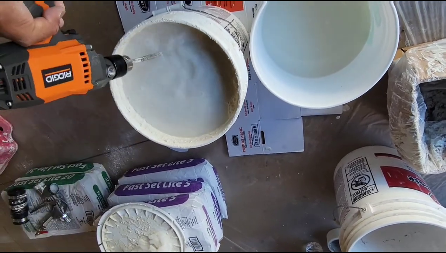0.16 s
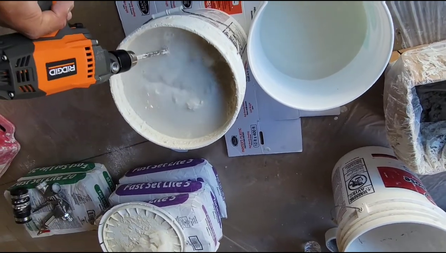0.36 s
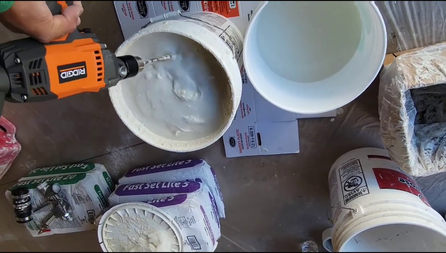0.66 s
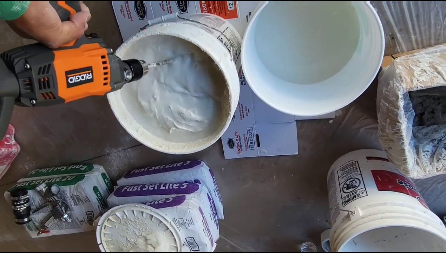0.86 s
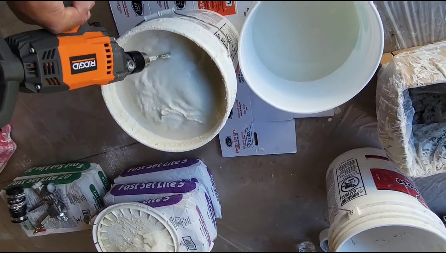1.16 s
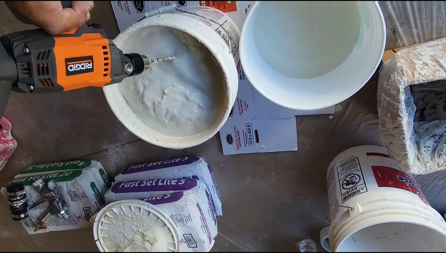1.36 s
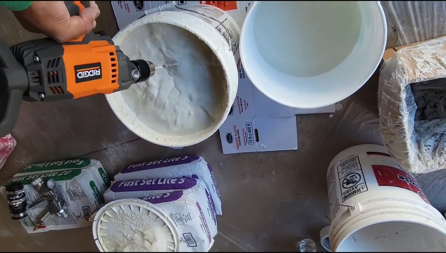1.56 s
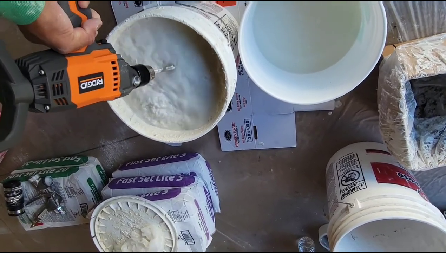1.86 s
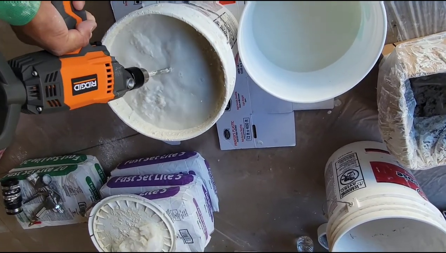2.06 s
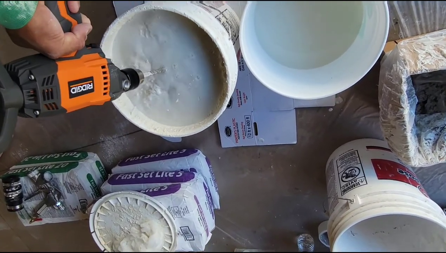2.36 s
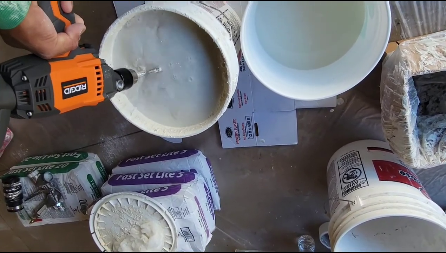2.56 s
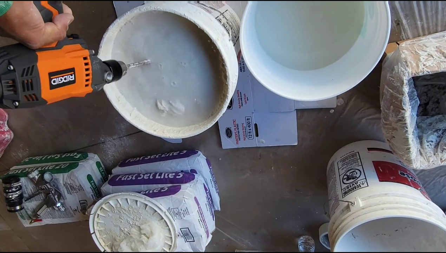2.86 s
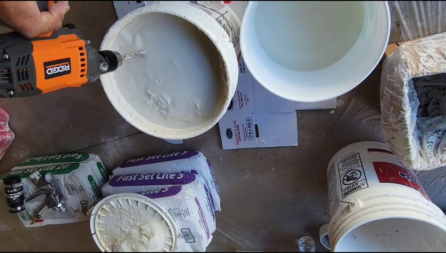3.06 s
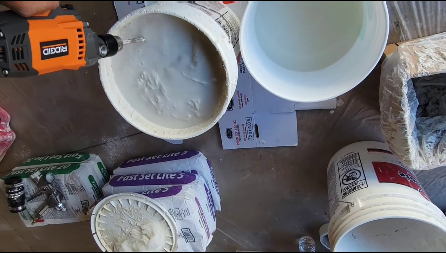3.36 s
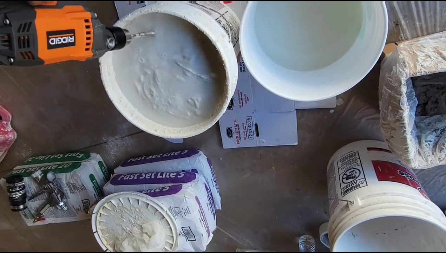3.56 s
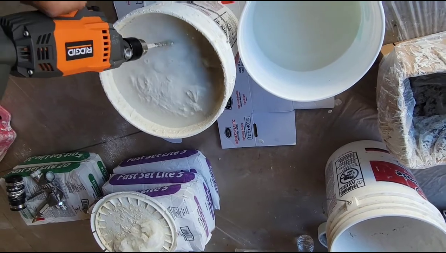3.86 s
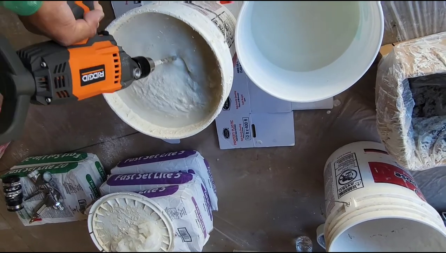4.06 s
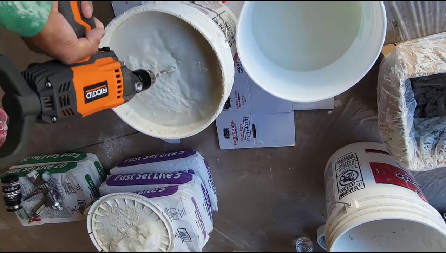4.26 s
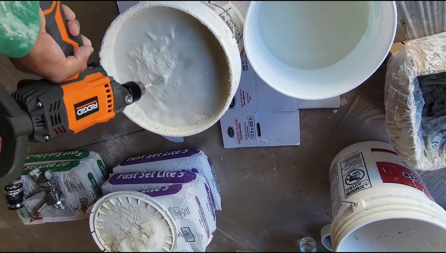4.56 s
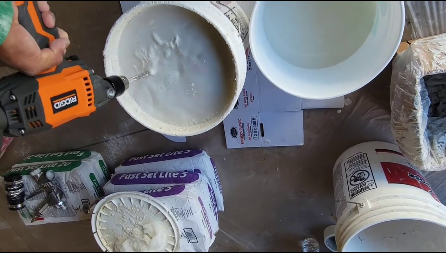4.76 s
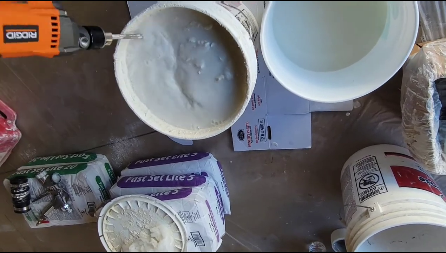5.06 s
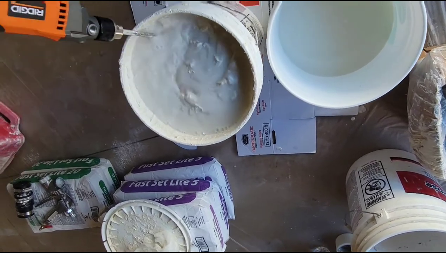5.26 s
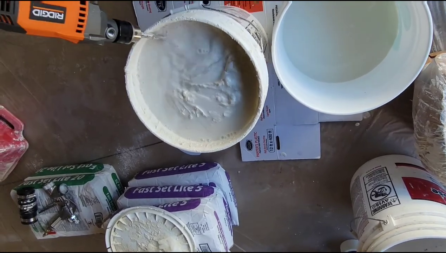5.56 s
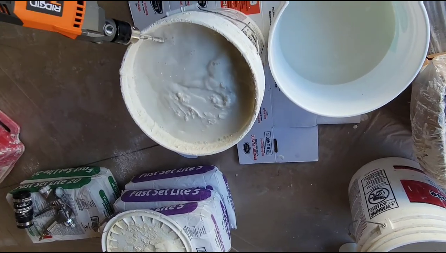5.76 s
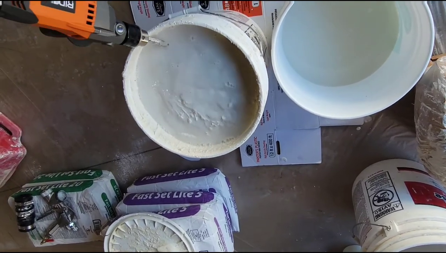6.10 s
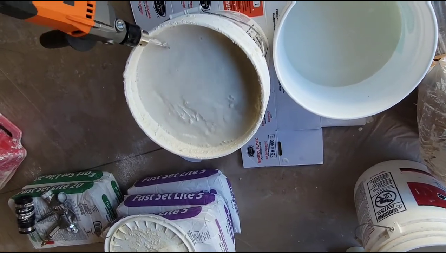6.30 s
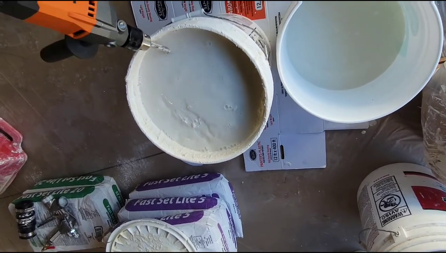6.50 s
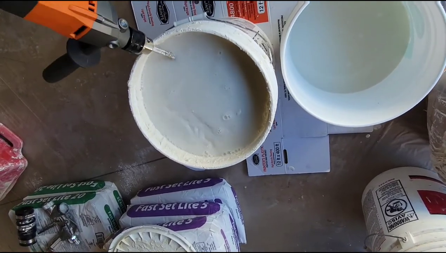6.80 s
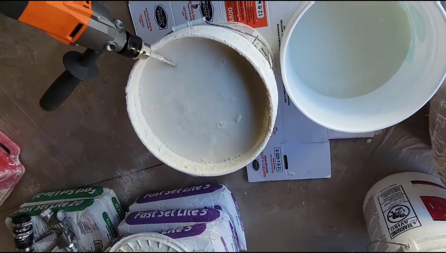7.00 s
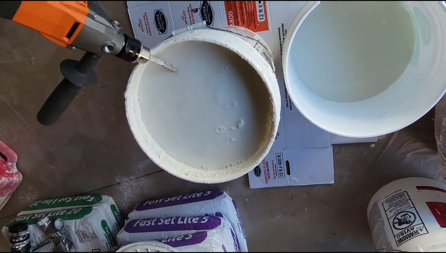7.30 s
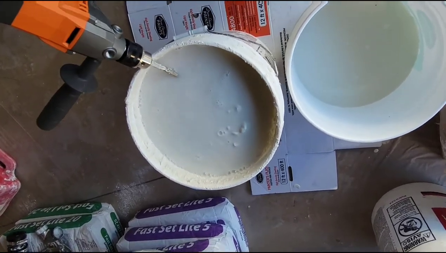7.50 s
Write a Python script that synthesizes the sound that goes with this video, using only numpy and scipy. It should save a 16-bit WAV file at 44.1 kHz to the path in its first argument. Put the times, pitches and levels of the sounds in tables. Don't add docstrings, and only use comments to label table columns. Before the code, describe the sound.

Building site, small two-microphone recorder close to a corded paddle mixer. The motor roars steadily, air rush, gear growl and piercing electrical tones wavering as the tool sways, with low muffled bumps on the bucket wall. Around five seconds power is cut after a last thump; the pitch slides down over two seconds into a hollow rattle, soft bucket hum and tiny ticks. Low far machinery stays behind, and the paddle scrapes quietly at the very end.

```python
import sys
import numpy as np
from scipy import signal
from scipy.fft import rfft, irfft, next_fast_len
from scipy.io import wavfile
from scipy.ndimage import map_coordinates

SR = 44100
rng = np.random.default_rng(int(sys.argv[2]) if len(sys.argv) > 2 else 0)


def generate_wav(sig):
    pcm = np.round(np.clip(np.atleast_2d(sig).T, -1, 1) * 32767).astype(np.int16)
    wavfile.write(sys.argv[1], SR, pcm)


def convert_level_to_amplitude(level_db):
    exponent = np.asarray(level_db, float) / 20
    return 10 ** exponent


N = 336910
T, SIZE = np.arange(N) / SR, next_fast_len(N)
HZ = np.fft.rfftfreq(SIZE, 1 / SR) + 1e-3
SWITCH_OFF_S, FULL_HZ = 5.026, 381.3
COASTING_S = np.clip(T - SWITCH_OFF_S, 0, None)


def unit(x):
    return x / np.sqrt(np.mean(x ** 2))


def colour(points):
    hz, db = np.transpose(points)
    return convert_level_to_amplitude(np.interp(np.log(HZ), np.log(hz), db))


def peaks(modes, base_db):
    power = sum(convert_level_to_amplitude(2 * db) / (1 + (2 * (HZ - hz) / width) ** 2) for hz, width, db in modes)
    return np.sqrt(power + convert_level_to_amplitude(2 * base_db))


def to_sound(spectrum):
    return irfft(spectrum, SIZE)[..., :N]


def shape(x, gain):
    return to_sound(rfft(x, SIZE) * gain)


def walk(rate):
    points = np.arange(0, N / SR + 1, 1 / rate)
    return 1.177 * np.interp(T, points, rng.standard_normal(len(points)))


def follow(table):
    return np.interp(T, *np.transpose(table))


def decay(start_s, ring_s):
    t = np.clip(T - start_s, 0, None)
    return t, 1000.0 ** (-t / ring_s)


# pitch_hz, level_db
FAR_DRONE = [(55, -62), (72, -51), (88.5, -54), (121, -63.5)]
# pitch_hz, level_db
SITE_AIR = [(30, -23.5), (80, 2), (150, -11.5), (300, -17.5), (700, -19), (1500, -29.5), (2500, -33.5),
            (5000, -43), (8000, -56), (15500, -54)]


def background():
    drone = 0
    for hz, db in FAR_DRONE:
        angle = 2 * np.pi * np.cumsum(hz + 1.476 * walk(6)) / SR
        drone = drone + convert_level_to_amplitude(db + 2.5 + 2.1 * walk(5)) * np.sin(angle)
    noise = rng.standard_normal((3, N))
    alike = 1 / (1 + HZ / 500)
    shared = shape(noise[0], colour(SITE_AIR) * np.sqrt(alike))
    air = shared + shape(noise[1:], colour(SITE_AIR) * np.sqrt(1 - alike))
    opposite = convert_level_to_amplitude(np.array([[0.7], [-0.7]]))
    return drone * opposite + convert_level_to_amplitude(-51) * unit(air)


# peak_s, level_db
BUCKET_HUM = [
    (6.5, -56),
    (6.87, -48),
    (7.28, -62),
]


def bucket_hum():
    pitch_hz, rise_db_s, fade_db_s = 710, 88, 66
    grit = rng.standard_normal(N) * convert_level_to_amplitude(1.4 * walk(150))
    level = sum(convert_level_to_amplitude(db - np.maximum(rise_db_s * (s - T), fade_db_s * (T - s))) for s, db in BUCKET_HUM)
    return unit(shape(grit, peaks([(pitch_hz, 30, 0)], -59) ** 2)) * level


# start_s, level_db, pitch_hz
BRUSH_CLICKS = [
    (7.007, -53.5, 11000),
    (6.86, -51, 4500),
]


def brush_clicks():
    out = np.zeros(N)
    for s, db, hz in BRUSH_CLICKS:
        t, ring = decay(s, 0.008)
        out += convert_level_to_amplitude(db) * ring * np.sin(2 * np.pi * hz * t)
    return out


# pitch_hz, width_hz, level_db
SCRAPE_MODES = [(382, 39, -2), (674, 26, -1), (857, 34, 0), (1650, 120, -7), (2150, 100, -10),
                (2750, 31, -7), (4270, 37, -6), (4820, 27, -9)]
# pitch_hz, level_db
SCRAPE_COLOUR = [(150, -12), (400, -5), (900, -6.5), (2500, -3.5), (5000, -9.5), (6500, -20.5),
                 (15500, -36)]


def lift_scrape():
    start_s, level_db, attack_s, swell_db_s = 7.504, -45.5, 0.005, 10
    lead_db, lead_s = -11, 0.03
    grit = rng.standard_normal((3, N)) * convert_level_to_amplitude(1.4 * walk(150))
    near = grit[0] + 1.8 * grit[1:]
    near[1] = np.roll(near[1], 8)
    drag = shape(near, peaks(SCRAPE_MODES, -13.5) * colour(SCRAPE_COLOUR))
    since = T - start_s
    bite = np.clip(1 + since / attack_s, 0, 1)
    slide = convert_level_to_amplitude(lead_db) * np.exp(np.minimum(since, 0) / lead_s)
    return unit(drag) * convert_level_to_amplitude(level_db + swell_db_s * since) * np.maximum(bite, slide)


# start_s, level_db, pitch_hz, ring_s
BUCKET_KNOCKS = [(0.54, -32.5, 300, 0.077), (0.654, -26, 250, 0.09), (0.771, -29.5, 175, 0.11),
                 (0.891, -35.5, 177, 0.06), (1.007, -28.5, 173, 0.12), (1.098, -29, 162, 0.12),
                 (1.134, -24, 91, 0.074), (1.249, -27, 166, 0.081), (1.72, -31.5, 183, 0.06),
                 (2.217, -34, 199, 0.083), (3.66, -36.5, 290, 0.06), (5.015, -36.5, 118, 0.06),
                 (5.079, -28.5, 100, 0.06)]


def knocks():
    out = np.zeros(N)
    slap = shape(rng.standard_normal(N), colour([(60, -16), (150, 7), (400, 6), (900, -17.5)]))
    for s, db, hz, ring_s in BUCKET_KNOCKS:
        t, ring = decay(s, ring_s)
        out += convert_level_to_amplitude(db) * ring * (np.sin(2 * np.pi * hz * t) + 4 * slap * (t > 0))
    return out * convert_level_to_amplitude(np.array([[-2.5], [-4.5]]))


# time_s, turns_hz
POWERED_SPEED = [(0, 366.6), (.3, 370.9), (.6, 373.7), (1.2, 374.2), (1.5, 376.1), (2.4, 378), (3, 377.8),
                 (3.9, 380), (4.5, 382.6), (5.03, 381.3)]


def armature():
    share = np.linspace(1, 0, 2000)
    drag = 82.1 + 170.7 * share + 217.6 * share ** 4
    reached_s = SWITCH_OFF_S + np.cumsum(FULL_HZ / len(share) / drag)
    coast = np.interp(T, reached_s, FULL_HZ * share)
    return np.where(T < SWITCH_OFF_S, follow(POWERED_SPEED), np.maximum(coast, 1))


def tones(orders, hz, wobble_db):
    angle = 2 * np.pi * np.cumsum(hz) / SR
    out = np.zeros(N)
    for order, db in orders:
        sine = np.sin(order * angle + 2 * np.pi * rng.random())
        out += convert_level_to_amplitude(db + wobble_db * walk(14)) * sine * (order * hz < SR / 2.5)
    return out


# order_per_turn, level_db
FIELD_TONES = [(1, -28), (2, -17), (6, -24), (19, -21), (20, -28), (28.7, -19), (37, -23)]


def field_tones(hz):
    powered = np.clip(1 - COASTING_S / 0.25, 0, 1)
    return powered * tones(FIELD_TONES, hz, 2.1)


# order_per_turn, level_db
PINION_TONES = [(4, 0), (8, -10), (12, -11), (16, -9), (20, -10), (28, -10), (36, -8), (104, -8)]
# pitch_hz, width_hz, level_db
SHAFT_MODES = [(470, 70, -11), (692, 70, -7), (1080, 110, -12.5)]


def pinion_tones(hz, share):
    mesh_hz = PINION_TONES[0][0] * hz
    swell = sum(convert_level_to_amplitude(2 * db) / (1 + (2 * (mesh_hz - f) / width) ** 4) for f, width, db in SHAFT_MODES)
    steady = convert_level_to_amplitude(-19.5) * share ** 0.8
    return np.sqrt(swell + steady ** 2) * tones(PINION_TONES, hz, 1.7)


# order_per_turn, level_db
BAR_OVERTONES = [(48, -3), (72, -1), (96, -4), (120, -4), (144, -5)]
# pitch_hz, width_hz, level_db
HOLDER_MODES = [(3250, 700, 10), (4200, 500, 2), (6600, 1200, 2), (8800, 2500, 5), (12500, 4000, 1)]


def commutator_tones(hz, share, slowed_db):
    bar_hz = 24 * hz
    cap = 1 / (1 + (1600 / bar_hz) ** 8) / (1 + (bar_hz / 4350) ** 30) + convert_level_to_amplitude(-16) * share
    cap *= 1 + 1 / (1 + ((bar_hz - 3770) / 440) ** 2)
    bar_tone = convert_level_to_amplitude(-7.5) * cap * tones([(24, 0.0062)], hz, 2.3)
    clicks = convert_level_to_amplitude(np.minimum(-25.5 - 1.5 * slowed_db, -9.5)) / (1 + (40.3 / hz) ** 4)
    return bar_tone + clicks * shape(tones(BAR_OVERTONES, hz, 3.0), peaks(HOLDER_MODES, -20))


# order_per_turn, level_db
BLADE_TONES = [(39, 0), (38.68, -19), (39.32, -21)]
# time_s, level_db
OUTLET_AIM = [(0, -2.5), (.9, -2.5), (1.3, 6), (1.43, -10), (1.75, -1), (2, -12.5), (2.25, -2), (2.45, -1),
              (2.56, -11), (2.8, 0), (3.35, -2.5), (3.85, 1), (3.97, -6), (4.5, -9.5), (4.7, -3), (5, -3.5),
              (5.5, 1), (5.9, -10.5)]


def fan_tones(hz, slowed_db):
    return convert_level_to_amplitude(follow(OUTLET_AIM) + 0.8 * slowed_db) * tones(BLADE_TONES, hz, 3.2)


# pitch_hz, level_db
LEFT_COLOUR = [(60, -30), (200, -20), (560, -13.5), (800, -4), (1700, 0.5), (2200, -6.5), (3400, -6),
               (5300, -3), (6500, -16), (7300, -16), (8500, -21.5), (12500, -10.5), (15000, -15),
               (16000, -28)]
# pitch_hz, level_db
RIGHT_COLOUR = [(60, -39), (200, -22.5), (560, -20), (800, -6.5), (1700, 0.5), (2200, -1), (2900, -6.5),
                (3400, -14), (5000, -11.5), (7200, -9.5), (8500, -13.5), (10000, -11.5), (12500, -20),
                (16000, -24.5)]
# pitch_hz, phase_rad
LEFT_LEAD = [(0, 0), (1120, 1.52), (1460, 2), (2500, 3.5), (3010, 6), (3530, 2), (3790, 4.5), (4820, 4),
             (5600, 6), (7060, 13), (9470, 16.5), (11100, 17.5), (14600, 17), (15800, 23)]
# pitch_hz, level_db
ROOM_SCATTER = [(150, -12), (400, -1.5), (800, -1), (1500, -8.5), (3000, -1), (6000, 1.5), (9000, 1),
                (14000, -6)]


def ports(x, scattered):
    swayed = map_coordinates(x, [np.arange(N) + 0.45 * walk(1.5)], order=3, mode="nearest")
    lead = np.exp(-1j * np.interp(HZ, *np.transpose(LEFT_LEAD)))
    direct = np.array([rfft(x, SIZE), rfft(swayed, SIZE) * lead])
    room = colour(ROOM_SCATTER)
    mixed = (direct + rfft(scattered, SIZE) * room) / np.sqrt(1 + room ** 2)
    return mixed * [colour(LEFT_COLOUR), colour(RIGHT_COLOUR)]


def radiated_db(share, full_db, power, rub_db):
    rest_s, rest_fade_s = 7.3, 0.05
    moving = 1 / (1 + np.exp(np.clip((T - rest_s) / rest_fade_s, -50, 50)))
    air, rubbing = share ** (2 * power), convert_level_to_amplitude(2 * rub_db) * share ** (2 * 0.62)
    return full_db + 10 * np.log10(air + rubbing * moving)


# pitch_hz, width_hz, level_db
HOUSING_MODES = [(704, 153, -4.5), (1144, 66, -4.5), (1778, 146, -2.5), (3017, 234, -2.5), (3776, 96, -1),
                 (4960, 2800, -6.5), (7020, 680, -8), (10900, 380, -17), (12600, 540, -13)]


def tool_body(heard, share, gear_db):
    casing_db = radiated_db(share, -20, 2.25, -22.5)
    casing_db -= 1.5 * (1 - np.exp(-COASTING_S / 0.1))
    vent_db = radiated_db(share, -25, 2.84, -29.5)
    body = heard * peaks(HOUSING_MODES, -8.0)
    low = 1 / (1 + (HZ / 2050) ** 6)
    high = 1 / (1 + (6400 / HZ) ** 8)
    middle = 1 - low - high
    growl = low / (1 + (1350 / HZ) ** 10)
    slack_db = -6 * (1 - np.exp(-COASTING_S / 0.26))
    out = to_sound(body * (low - growl)) * convert_level_to_amplitude(gear_db + 22)
    out += to_sound(body * growl) * convert_level_to_amplitude(gear_db + slack_db + 22)
    out += to_sound(body * middle) * convert_level_to_amplitude(casing_db + 21 + 0.5 * walk(6.9))
    out += to_sound(body * high) * convert_level_to_amplitude(vent_db + 28 + 0.6 * walk(14))
    upper_band = to_sound(body * np.exp(-((HZ - 6100) / 800) ** 2) * middle)
    lost = (1 - convert_level_to_amplitude(-4)) * np.clip(1 - share, 0, 1) ** 2
    return out - upper_band * convert_level_to_amplitude(casing_db + 21) * lost


# pitch_hz, width_hz, level_db
LOOSE_GEAR_MODES = [(383, 200, -9), (684, 32, -11), (1045, 91, -0.5), (2323, 120, 1), (3960, 750, -9.5)]


def gear_rattle(heard, gear_db):
    loaded_db, free_db = -28, -2.5
    held = np.exp(-COASTING_S / 0.24)
    ring_db = free_db + held * (loaded_db - free_db + 1.5 * walk(3.2))
    return to_sound(heard * peaks(LOOSE_GEAR_MODES, -37)) * convert_level_to_amplitude(gear_db + ring_db + 25.5)


def drill():
    hz = armature() * (1 + 0.00038 * walk(40))
    share = np.where(COASTING_S > 0, hz / FULL_HZ + 0.019, 1)
    slowed_db = 20 * np.log10(share)
    hiss = rng.standard_normal((3, N)) * convert_level_to_amplitude(0.5 * walk(30) + 0.37 * walk(400))
    force = hiss[0] + field_tones(hz) + pinion_tones(hz, share)
    force += commutator_tones(hz, share, slowed_db) + fan_tones(hz, slowed_db)
    heard = ports(force, hiss[1:])
    gear_db = radiated_db(share, -20.5, 1.59, -30.5)
    return tool_body(heard, share, gear_db) + gear_rattle(heard, gear_db)


def scene():
    return background() + bucket_hum() + brush_clicks() + lift_scrape() + knocks() + drill()


def top_cut(x):
    return signal.sosfilt(signal.butter(12, 15740, fs=SR, output="sos"), x)


def record(dry):
    rounded = np.tanh(0.6 * dry) / 0.6
    return top_cut(rounded)


dry = scene()
out = record(dry)
generate_wav(out)
```